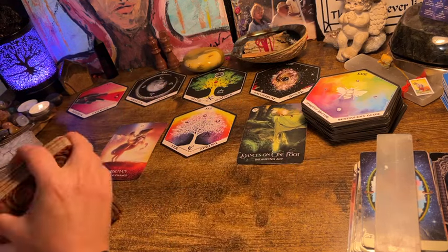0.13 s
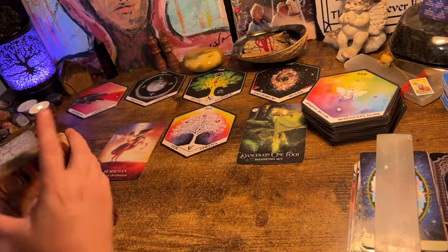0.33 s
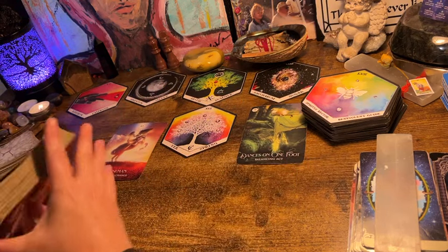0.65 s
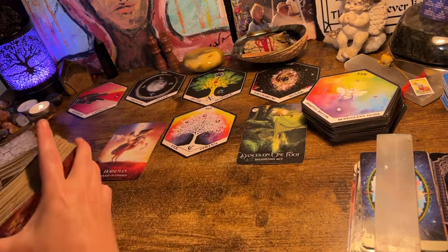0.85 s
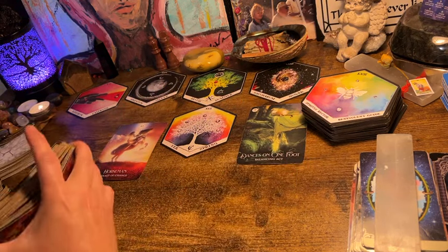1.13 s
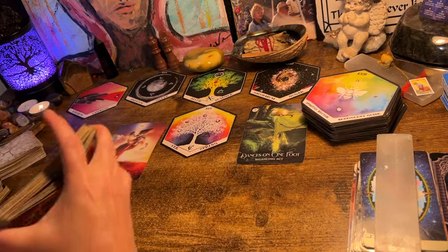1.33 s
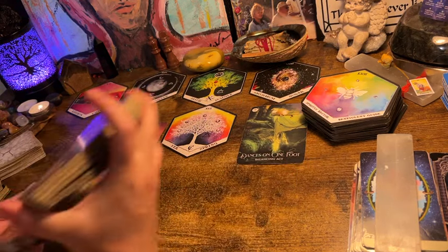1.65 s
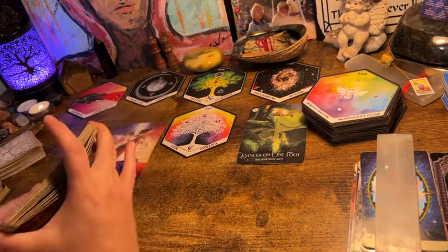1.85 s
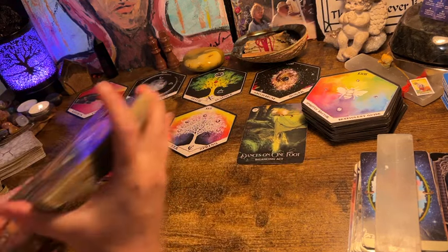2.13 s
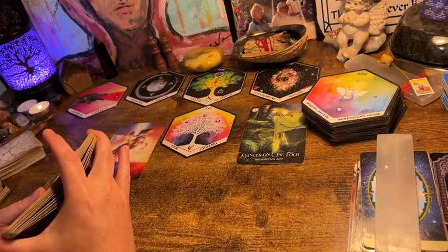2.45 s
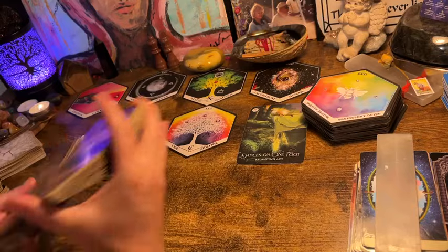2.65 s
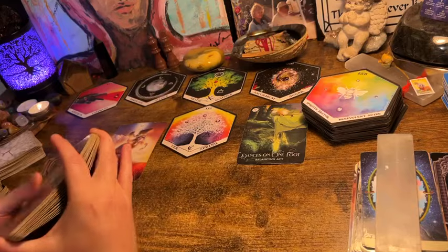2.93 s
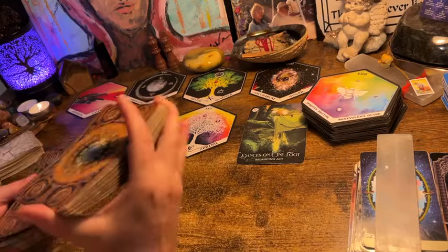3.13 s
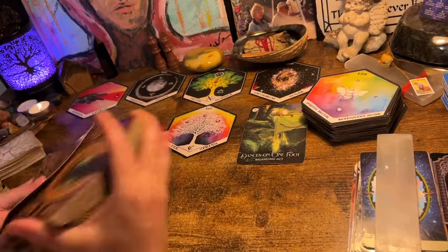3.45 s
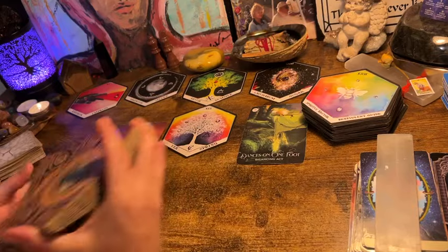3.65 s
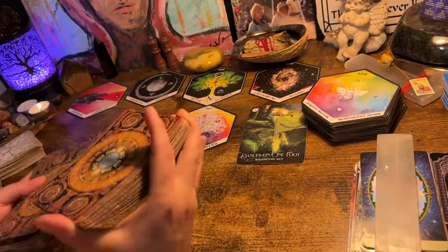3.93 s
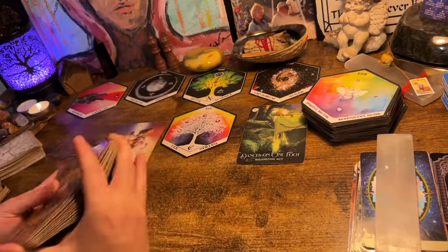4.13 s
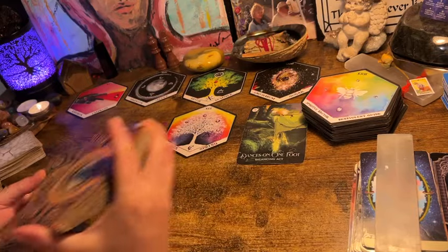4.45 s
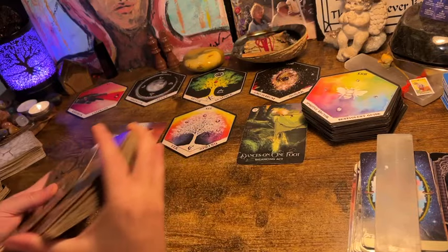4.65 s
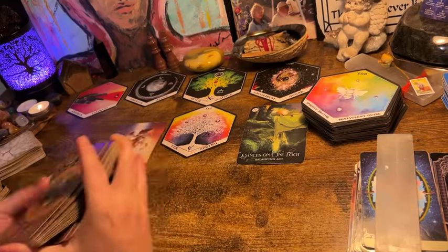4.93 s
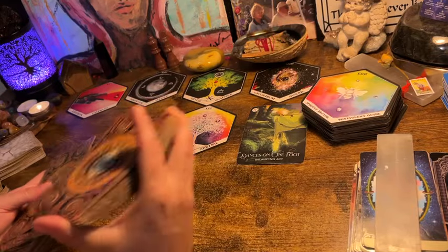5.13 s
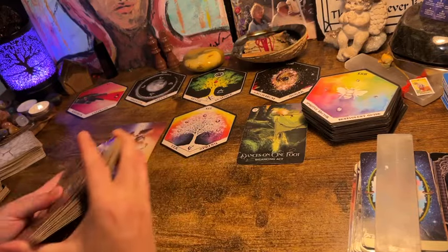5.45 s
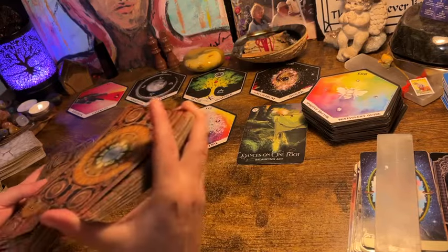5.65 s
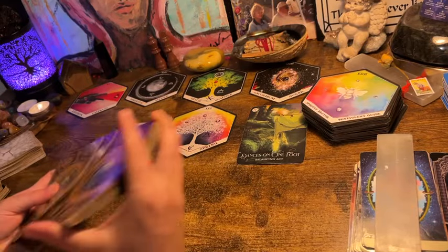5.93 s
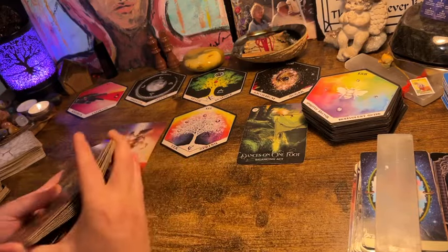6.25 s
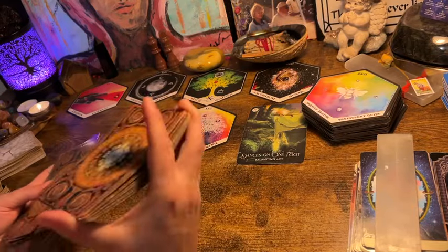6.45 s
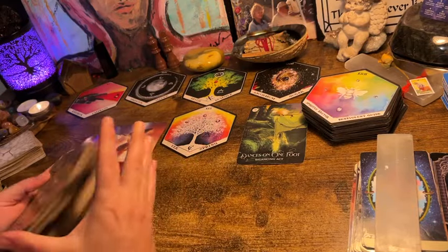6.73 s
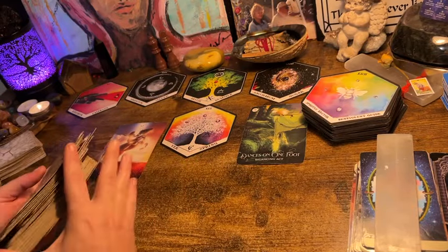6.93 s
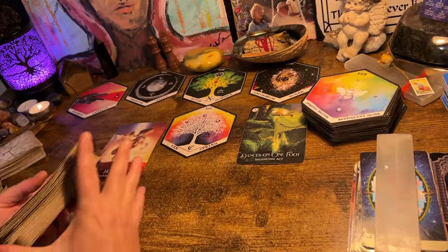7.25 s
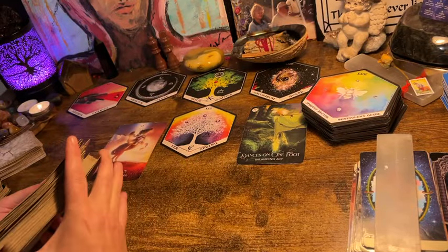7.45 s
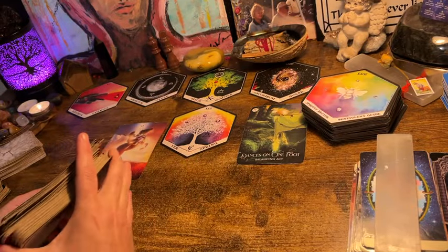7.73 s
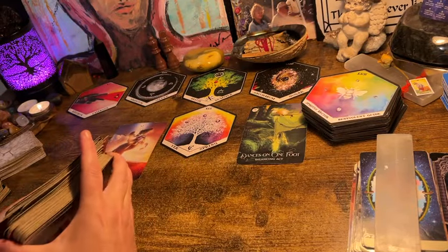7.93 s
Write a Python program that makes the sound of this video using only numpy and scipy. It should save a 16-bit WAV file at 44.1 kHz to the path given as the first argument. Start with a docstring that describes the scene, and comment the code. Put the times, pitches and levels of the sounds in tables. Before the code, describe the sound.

Close to the microphone in a quiet room, a soft thump and a sharp knock sound as a card deck meets a wooden tabletop. An overhand shuffle follows, with short, bright swishes, crisp edge snaps and light slaps of card on card, growing busier before settling into slight rustles. A faint wash of ventilation, mains hum and a slowly swelling low rumble lie underneath.

```python
"""In a quiet room, at a wooden table, hands shuffle a deck of stiff cards overhand, close by.
First the deck is knocked on the table and the wood rings. Then packets of cards scrape over
each other, their edges tick, and they clap home, squeezing out the air between them.
Underneath lie the wash of ventilation, mains hum and a slow, low rumble."""
import sys
import numpy as np
from scipy import signal
from scipy.fft import rfft, irfft
from scipy.io import wavfile
from scipy.ndimage import uniform_filter1d

SR = 44100
rng = np.random.default_rng(int(sys.argv[2]) if len(sys.argv) > 2 else 0)


def wav_record(signal):
    """Record a signal, one row per channel, as 16-bit PCM in the file named by sys.argv[1]."""
    frames = np.transpose(np.atleast_2d(signal))
    bounded = np.clip(frames, -1, 1)
    # unit amplitude maps onto the largest positive 16-bit level
    quanta = np.round(bounded * 32767).astype(np.int16)
    wavfile.write(sys.argv[1], SR, quanta)


N = 357210

# Tone colour of the ventilation: pitch_hz, level_db
VENT_COLOUR = [(18, -55), (30, -21), (66, -11.5), (103, 2), (199, -8), (252, 0), (426, -14), (499, -4.5),
               (962, -14.5), (1220, -11), (2610, -27), (3870, -33.5), (8980, -48), (13700, -66),
               (16000, -58)]
# Narrow bands of wavering hum: pitch_hz, level_db, filter_width_hz
HUM_BANDS = [(118.8, -57, 8.3), (175.6, -58.5, 22), (242.2, -64, 5.6), (338.5, -59, 98), (485, -65, 8.1),
             (1194, -71, 44), (1327, -68, 34)]
# How the rumble swells and sinks: time_s, level_db
RUMBLE_LEVELS = [(0, -62), (1, -58.5), (2.67, -53.5), (2.84, -54), (3.17, -51.5), (4.35, -48.5), (4.5, -54),
                 (5, -61.5), (5.72, -59), (6.3, -64), (6.68, -60), (7.5, -60.5), (7.73, -50), (8.1, -67)]
# Notes the table top rings with: pitch_hz, level_db, ring_s (time to fade by 60 dB)
TABLE_NOTES = [(227, -7, 0.051), (396, -11, 0.045), (496, -12, 0.22), (970, 2.5, 0.027), (1080, -17, 0.036),
               (1334, 2.5, 0.034), (1640, -5, 0.035), (2145, 2, 0.034), (2510, -11, 0.033),
               (2790, -4, 0.14), (3000, -3, 0.07), (3350, -24, 0.094), (3540, -7.5, 0.13), (5500, -8, .04)]
# The deck hits the table: start_s, level_db, hardness (0 to 1), thump_db
DECK_KNOCKS = [(0.155, -26, 0.02, -43), (0.165, -26, 0.04, -23), (.273, -20.5, 0.92, -50),
               (.2785, -14, 0.96, -20), (.283, -20, 0.67, -47), (.296, -24, 0.2, -51)]
# Card edges snap: start_s, level_db
EDGE_TICKS = [(1.0036, -36), (1.474, -37), (1.7988, -27), (2.0158, -37), (2.1425, -61), (2.243, -40),
              (2.889, -32), (3.2044, -59), (3.2992, -28), (3.3478, -30), (3.4087, -38), (3.4216, -15),
              (3.6745, -36), (4.0716, -48), (4.465, -23.5), (4.8783, -41), (5.3355, -35), (5.7633, -39),
              (6.386, -25), (6.577, -27.5), (6.6504, -11.5), (7.457, -49), (7.6211, -60)]
# Packets land: start_s, level_db, pitch_hz, hollowness (0 to 1)
PACKET_CLAPS = [(1.002, -55, 3360, .65), (1.551, -35, 1020, 0.9), (1.751, -37.5, 4740, 0.4),
                (1.758, -34, 1020, 0.34), (1.797, -36.5, 2820, 0.32), (2.245, -32, 640, 0.37),
                (2.638, -39.5, 705, 0.4), (2.659, -34, 760, 0.52), (2.89, -34.5, 1080, 0.07),
                (3.022, -43, 2780, .6), (3.097, -37, 1040, 0.26), (3.108, -37, 1000, 0.37),
                (3.121, -35.5, 850, .4), (3.3, -36.5, 1780, .33), (3.408, -36, 2760, 0.74),
                (3.42, -47, 3750, 0.7), (3.484, -38.5, 1150, 0.4), (3.497, -37, 796, 0.5),
                (3.676, -35.5, 710, 0.02), (3.879, -35, 814, 0.42), (4.072, -37.5, 764, 0.24),
                (4.188, -42.5, 2830, .65), (4.262, -33.5, 3350, 0.3), (4.272, -34, 1500, 0.07),
                (4.281, -38, 2100, 0.5), (4.61, -39, 3120, 0.73), (4.704, -37, 600, 0.17),
                (4.878, -42, 2680, 0.5), (5.019, -47.5, 3300, .8), (5.129, -35.5, 760, 0.3),
                (5.546, -38, 2470, 0.4), (5.86, -43, 3060, 0.6), (5.982, -37.5, 606, 0.13),
                (6.384, -38, 1100, 0.06), (6.579, -36.5, 976, 0.75), (6.652, -34, 850, 0.2),
                (6.697, -33, 800, 0.86)]
# Tone colour of the bright scrape: pitch_hz, level_db
BRIGHT_COLOUR = [(1760, -48), (3000, -27), (3240, -22), (4500, -5), (5440, -3), (6530, 0), (9400, 0.5),
                 (14900, -0.5), (16000, 1)]
# Tone colour of the dull scrape: pitch_hz, level_db
DULL_COLOUR = [(500, -27), (1200, -6), (2200, -6), (3200, -1), (4500, -2.5), (6500, -6.5), (9000, -41)]
# Hand strokes: start_s, push_s, glide_s, touch_db, peak_db, dull_offset_db, fade_db_per_s
HAND_STROKES = [ (0, 0.011, 0.045, -59, -67, -12, 160), (.13, 0.025, .001, -90, -66, 5, 150),
                (.236, .03, 0.055, -71, -65, -9, 300), (0.268, 0.0048, .001, -66, -50.5, 9, 700),
                (.336, 0.18, .01, -68, -64.5, -3, 300), (.55, .005, .01, -67, -69.5, -7, 200),
                (.665, .07, .001, -76, -67, -11, 500), (.93, .08, .001, -80, -64.5, -2, 550),
                (1.09, 0.084, .001, -76, -63.5, -1.5, 160), (1.33, 0.073, 0.046, -69, -57, -3, 300),
                (1.468, 0.0074, 0.045, -49, -44.5, -13.5, 254), (1.7, .012, 0.088, -62, -53, -6.5, 450),
                (1.87, 0.092, .001, -71, -48.5, -5, 270), (2.136, 0.0049, .001, -90, -80, 14.5, 400),
                (2.242, .012, .006, -43, -46, -2.5, 450), (2.285, .025, .001, -62, -55, -13, 360),
                (2.5, 0.054, 0.065, -81, -55, -4.5, 400), (2.61, 0.019, .001, -58, -43, -15, 300),
                (2.75, 0.076, 0.043, -88, -76, 3, 400), (2.888, 0.013, 0.017, -42.5, -40.5, -11.5, 600),
                (2.96, .11, 0.014, -64.5, -30.5, -15, 260), (3.298, .002, 0.0087, -48, -49.5, -3, 200),
                (3.364, 0.054, .001, -59, -42, -13, 500), (3.407, 0.034, .014, -40, -25.5, -21, 290),
                (3.57, 0.07, .001, -70, -65.5, -6, 400), (3.674, 0.023, 0.016, -53, -48, -6.5, 700),
                (3.74, 0.059, .015, -61.5, -43, -8, 500), (3.822, 0.025, 0.013, -44, -33, -14.5, 303),
                (4.07, .005, .041, -50.5, -50, -6, 600), (4.14, .024, 0.069, -60, -48.5, -8, 500),
                (4.213, 0.032, .012, -45, -31, -24, 211), (4.38, 0.076, .001, -68, -67, -4, 400),
                (4.452, 0.012, 0.059, -70, -47, -9.5, 700), (4.56, 0.044, 0.04, -59, -46, -10, 500),
                (4.652, 0.011, 0.019, -47, -32, -18, 312), (4.877, 0.081, .001, -49, -49.5, -7.5, 400),
                (4.99, 0.11, .001, -52, -42.5, -8.5, 370), (5.24, 0.058, .001, -75.5, -51, -8, 700),
                (5.32, 0.049, .001, -60, -42.5, -11, 250), (5.42, 0.065, 0.064, -55.5, -43.5, -7.5, 450),
                (5.69, .036, .03, -87, -69, -3, 500), (5.758, 0.01, 0.04, -38, -46, -8.5, 449),
                (5.84, 0.038, 0.033, -58, -46, -7.5, 499), (5.916, 0.036, .001, -47, -36.5, -16, 330),
                (6.12, .035, .01, -92, -69.5, -5, 500), (6.165, 0.0088, 0.041, -55, -45, -13, 200),
                (6.248, .04, 0.045, -54, -47.5, -9, 400), (6.32, 0.032, 0.017, -46, -38.5, -13, 350),
                (6.478, 0.057, .001, -79, -55.5, -9, 470), (6.565, .005, .003, -46, -38, -9, 500),
                (6.577, 0.025, 0.0065, -35.5, -31.5, -9.5, 360),
                (6.653, 0.0023, 0.0092, -50, -41.5, -3.5, 441), (6.73, .04, .001, -73, -70, -7, 600),
                (6.841, 0.026, 0.0061, -52, -42.5, -8.5, 403), (7.05, 0.083, .124, -90.5, -69, -3.5, 298),
                (7.318, 0.067, .001, -92, -66.5, -6, 333.5), (7.43, 0.031, .014, -80, -59.5, -9, 320),
                (7.608, .014, .001, -91, -68.5, -2.5, 229), (7.668, .01, .001, -81, -72, -9, 600),
                (7.754, 0.018, .001, -84, -70, -6, 252), (7.87, .06, .17, -88, -84.5, 1, 304.5), ]


def gain(db):
    """Turns decibels into a number to multiply by."""
    return 10 ** (np.asarray(db) / 20)


def unit_level(x):
    """Scales a signal to an average (rms) level of 1."""
    return x / np.sqrt(np.mean(x ** 2) + 1e-20)


def coloured(x, points):
    """Shapes x with a tone colour curve, silent beyond its ends."""
    hz, db = np.transpose(points)
    freqs = np.fft.rfftfreq(len(x), 1 / SR)
    curve_db = np.interp(np.log(freqs + 1), np.log(hz), db, -120, -120)
    return irfft(rfft(x) * gain(curve_db), len(x))


def resonate(x, hz, width_hz):
    """Keeps the part of x near one pitch."""
    return signal.lfilter(*signal.iirpeak(hz, hz / width_hz, SR), x)


def add(mix, start_s, sound):
    """Mixes a sound in at its start time."""
    part = mix[round(start_s * SR):][:len(sound)]
    part += sound[:len(part)]


def background():
    """Ventilation air rushes steadily under a hum and a low rumble that swells and sinks."""
    air_noise, rumble_noise, drift, *hum_noises = rng.standard_normal((len(HUM_BANDS) + 3, N))
    t = np.arange(N) / SR
    air = gain(-50) * unit_level(coloured(air_noise, VENT_COLOUR))
    hum = gain(-59.5) * np.sin(2 * np.pi * 120 * t) + gain(-60.5) * np.sin(2 * np.pi * 503 * t)
    for (hz, db, width_hz), noise in zip(HUM_BANDS, hum_noises):
        hum += gain(db) * unit_level(resonate(resonate(noise, hz, width_hz), hz, width_hz))
    drone_hz = 67 + 3.87 * unit_level(uniform_filter1d(drift, size=8000))
    drone = np.sin(2 * np.pi * np.cumsum(drone_hz) / SR)
    murmur = unit_level(resonate(resonate(rumble_noise, 69, 30.33), 69, 30.33))
    swell = gain(np.interp(t, *np.transpose(RUMBLE_LEVELS)))
    return air + hum + swell * (0.66 * drone + 0.95 * murmur)


def room_echo(x, ring_s):
    """The room sends back many small echoes; their treble dies first."""
    t = np.arange(SR // 2) / SR
    echoes = rng.choice([-1., 1.], len(t)) * (rng.random(len(t)) < 3000 / SR) * (t > .004)
    low = signal.lfilter(*signal.butter(1, 4000, fs=SR), echoes)
    tail = low * gain(-60 * t / ring_s) + (echoes - low) * gain(-60 * t / (0.28 * ring_s))
    return signal.fftconvolve(x, tail / np.linalg.norm(tail))[:N]


def deck_knocks():
    """The deck rings the table and loose cards rattle; a soft blow misses the high notes."""
    out, t = np.zeros(N), np.arange(SR // 3) / SR
    noises = rng.standard_normal((len(DECK_KNOCKS), len(t)))
    thump = np.sin(2 * np.pi * 108 * t) * (t / 0.016) ** 3 * np.exp(3 - 3 * t / 0.011)
    hz, level_db, ring_s = np.transpose(TABLE_NOTES)[:, :, None]
    sign = (-1.) ** np.arange(len(hz))[:, None]  # neighbouring notes start in opposite directions
    rise = 1 - np.exp(-t * hz / 0.47)  # low notes swell later
    notes = sign * gain(level_db - 60 * t / ring_s) * np.sin(2 * np.pi * hz * t) * rise
    rattle_shape = (np.exp(-t / 0.0052) + 0.15 * np.exp(-t / 0.027)) * (1 - np.exp(-t / 0.001))
    for (start_s, db, hardness, thump_db), noise in zip(DECK_KNOCKS, noises):
        top_hz = 550 * 6.2 ** hardness
        ring = (notes / (1 + (hz / top_hz) ** 4)).sum(axis=0)
        band = signal.butter(3, [0.27 * top_hz, top_hz], "band", fs=SR, output="sos")
        rattle = unit_level(signal.sosfilt(band, noise)) * rattle_shape
        add(out, start_s, gain(db) * (0.5 * ring + 0.57 * rattle) + gain(thump_db) * thump)
    return out


def edge_ticks():
    """One card edge snaps past another with a tiny, sharp click."""
    out, t = np.zeros(N), np.arange(300) / SR
    noises = rng.standard_normal((len(EDGE_TICKS), len(t)))
    snap = np.sin(2 * np.pi * 9000 * t) * np.exp(-t / .0001)
    for (start_s, db), noise in zip(EDGE_TICKS, noises):
        add(out, start_s + 0.0012, gain(db) * (0.86 * snap + 0.23 * noise * np.exp(-t / 0.0012)))
    return out


def packet_claps():
    """Air is squeezed from between packets: a papery pat, or a hollow tock if they land flat."""
    out, t = np.zeros(N), np.arange(4000) / SR
    noises = rng.standard_normal((len(PACKET_CLAPS), 2, len(t)))
    pat_band = signal.butter(2, [650, 2800], "band", fs=SR)
    shape = (1 - np.exp(-t / 0.000646)) * np.exp(-t / 0.0092)
    for (start_s, db, hz, hollowness), (tock_noise, pat_noise) in zip(PACKET_CLAPS, noises):
        tone = 2.0 * np.sin(2 * np.pi * hz * t) * np.exp(-t / 0.0055)
        tock = tone + 0.72 * unit_level(resonate(tock_noise, hz, 0.29 * hz))
        pat = 0.59 * unit_level(signal.lfilter(*pat_band, pat_noise))
        add(out, start_s, gain(db) * (hollowness * tock + (1 - hollowness) * pat) * shape)
    return out


def grit(per_s, spread_db):
    """One card face catches on another in many tiny, uneven jolts."""
    size = gain(spread_db * np.minimum(rng.exponential(1, N), 5)) * rng.standard_normal(N)
    return size * (rng.random(N) < per_s / SR)


def shifting_gap(x, depth_db):
    """The tone colour drifts as the gap between the cards keeps changing."""
    spectrum = signal.stft(x, nperseg=256)[2]
    patches = uniform_filter1d(rng.standard_normal(spectrum.shape), size=4, axis=0)  # smooth over pitch
    patches = unit_level(uniform_filter1d(patches, size=8, axis=1))  # and over time
    return unit_level(signal.istft(spectrum * gain(depth_db * patches), nperseg=256)[1][:N])


def stroke_db(t, push_s, glide_s, touch_db, peak_db, fade_db_per_s):
    """Level of one stroke: the hand pushes, glides, brakes hard if it is fast, then eases off."""
    brake_db_per_s, slow_db = 555.5, -55
    pushed_db = touch_db + (peak_db - touch_db) * np.clip(t / push_s, 0, 1) ** 0.95
    after_s = np.maximum(t - push_s - glide_s, 0)
    braking_s = np.minimum(after_s, max(peak_db - slow_db, 0) / brake_db_per_s)
    return pushed_db - brake_db_per_s * braking_s - fade_db_per_s * (after_s - braking_s)


def card_slides():
    """Card faces rub together: a bright scrape and a dull one follow each stroke of the hand."""
    t = np.arange(SR // 2) / SR
    # Cards shift faintly even in resting hands. Strokes add to this as power (gain squared).
    bright_power, dull_power = np.full(N, gain(-88.5) ** 2), np.full(N, gain(-87) ** 2)
    for start_s, push_s, glide_s, touch_db, peak_db, dull_offset_db, fade in HAND_STROKES:
        bright_db = stroke_db(t, push_s, glide_s, touch_db, peak_db, fade)
        add(bright_power, start_s + 0.0015, gain(bright_db) ** 2)
        # The dull scrape swells less and lasts a little longer.
        dull_touch_db = peak_db - 0.75 * (peak_db - touch_db)
        dull_db = dull_offset_db + stroke_db(t, push_s, glide_s + 0.01, dull_touch_db, peak_db, fade)
        add(dull_power, start_s + 0.0011, gain(dull_db) ** 2)
    pressure = gain(.7 * unit_level(uniform_filter1d(rng.standard_normal(N), size=150)))
    bright = shifting_gap(coloured(grit(per_s=26000, spread_db=.6), BRIGHT_COLOUR), depth_db=2.0)
    treble = signal.filtfilt(*signal.butter(2, 9000, "high", fs=SR), bright)
    treble_db = 0.11 * (10 * np.log10(bright_power) + 43.5)  # faster strokes are brighter
    bright += (gain(treble_db) - 1) * treble
    dull = shifting_gap(coloured(grit(per_s=9000, spread_db=2.8), DULL_COLOUR), depth_db=2.5)
    bright_gain, dull_gain = uniform_filter1d(np.sqrt([bright_power, dull_power]) * pressure, size=12)
    return bright_gain * bright + dull_gain * dull


def scene():
    """Cards and table with their echo, over the background, in one channel."""
    cards = card_slides() + packet_claps() + edge_ticks() + deck_knocks()
    return (cards + gain(-12) * room_echo(cards, ring_s=0.19) + background())[None]


def record(dry):
    """The microphone loses the deepest bass and the highest treble."""
    low_hz, high_hz = 50, 15750
    thin = signal.sosfilt(signal.butter(3, low_hz, "high", fs=SR, output="sos"), dry)
    treble_cut = signal.firwin(511, high_hz, window=("kaiser", 9), fs=SR)
    return signal.oaconvolve(thin, treble_cut[None], "same")


dry = scene()
out = record(dry)
wav_record(out)
```